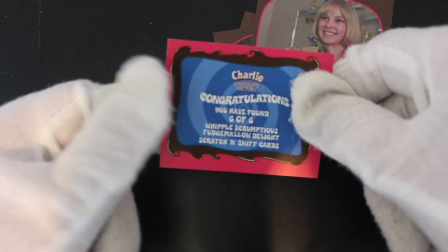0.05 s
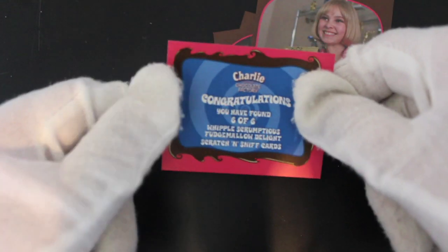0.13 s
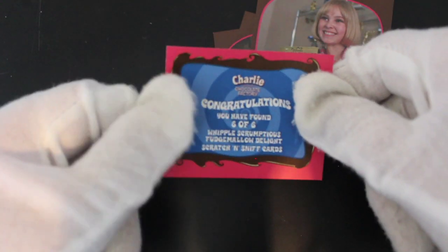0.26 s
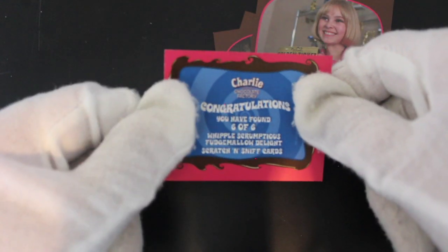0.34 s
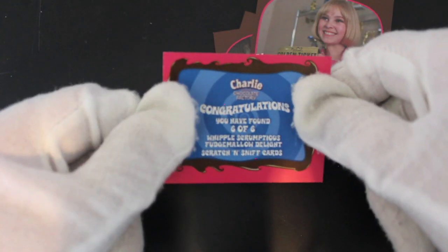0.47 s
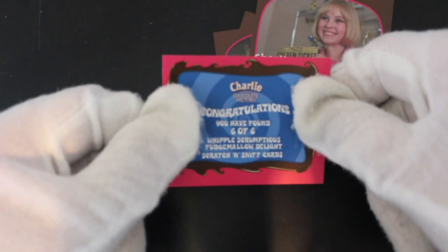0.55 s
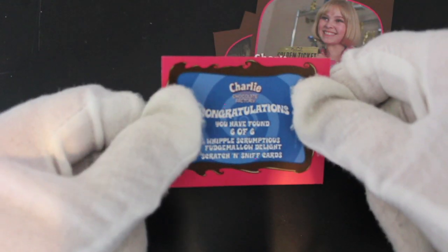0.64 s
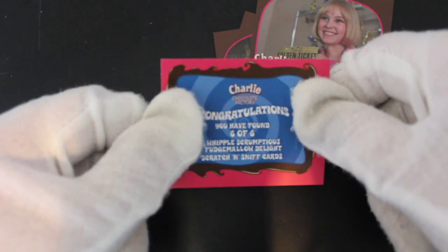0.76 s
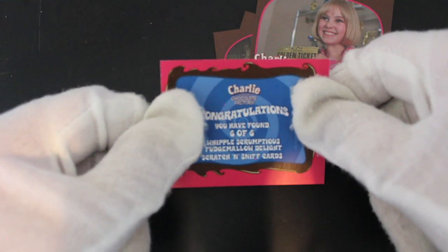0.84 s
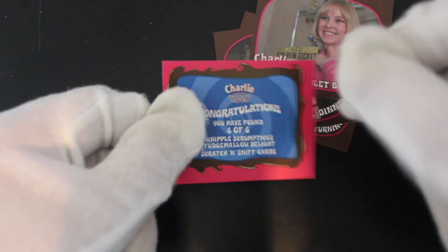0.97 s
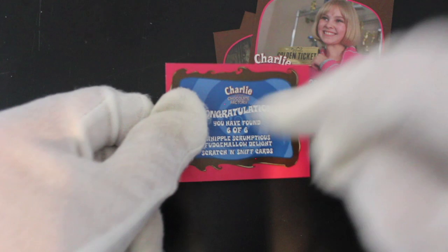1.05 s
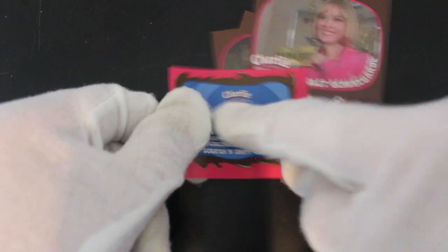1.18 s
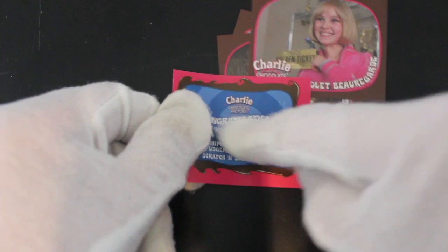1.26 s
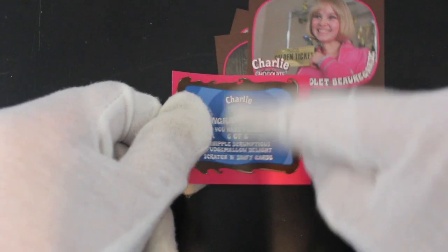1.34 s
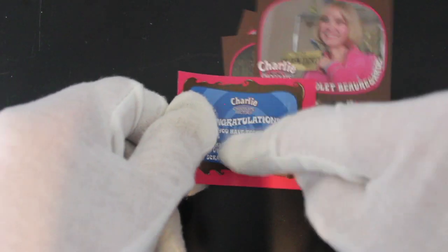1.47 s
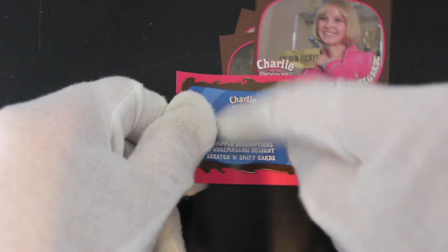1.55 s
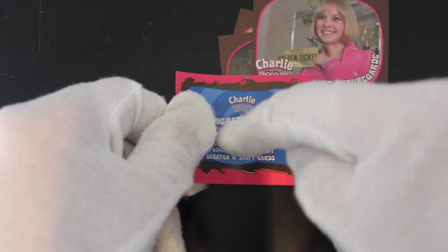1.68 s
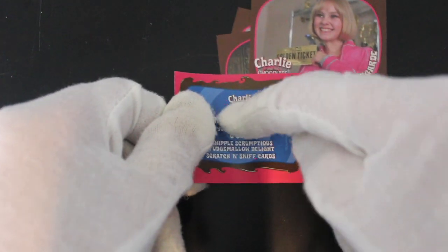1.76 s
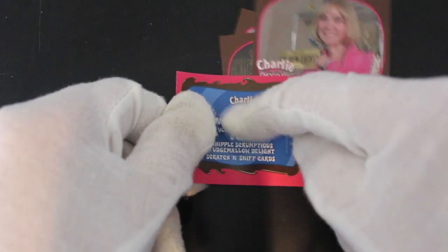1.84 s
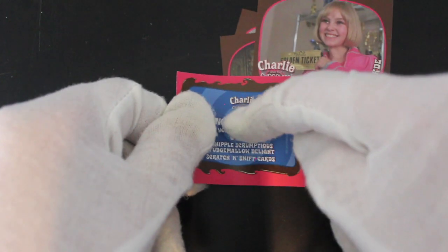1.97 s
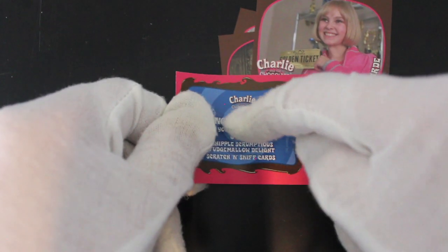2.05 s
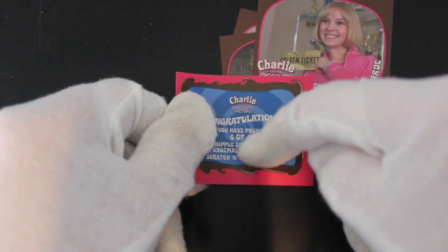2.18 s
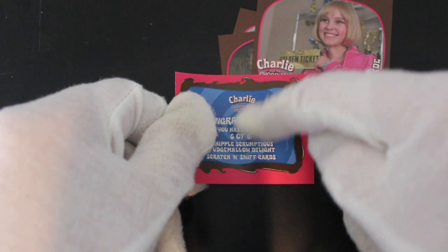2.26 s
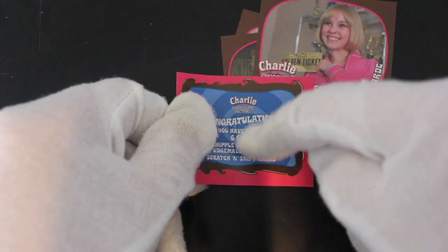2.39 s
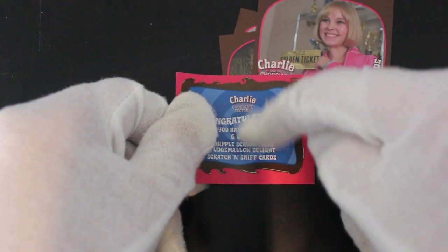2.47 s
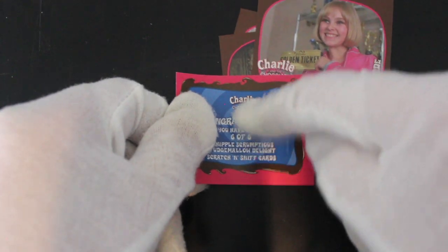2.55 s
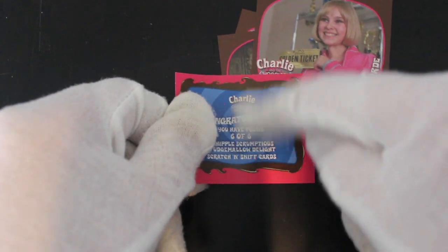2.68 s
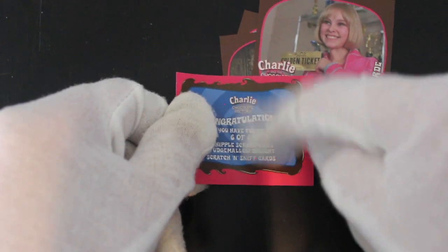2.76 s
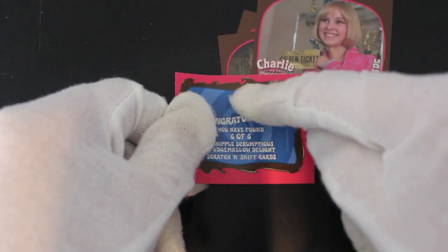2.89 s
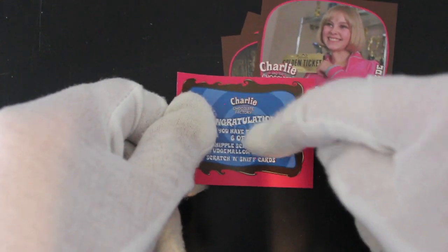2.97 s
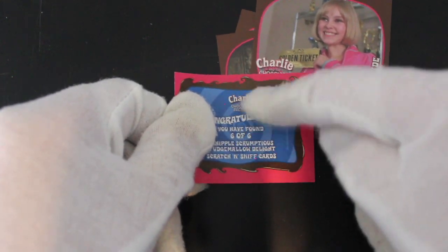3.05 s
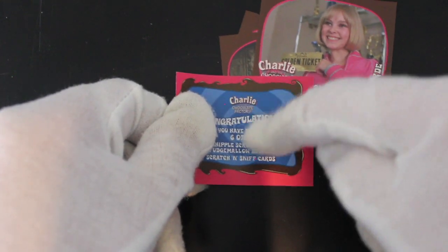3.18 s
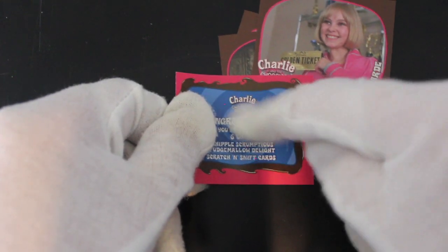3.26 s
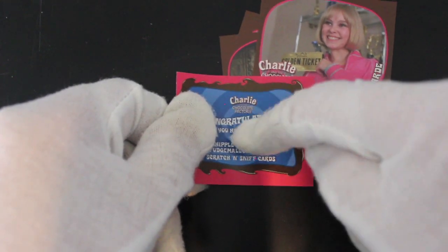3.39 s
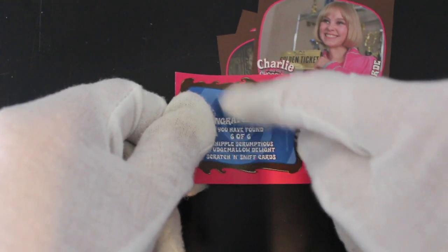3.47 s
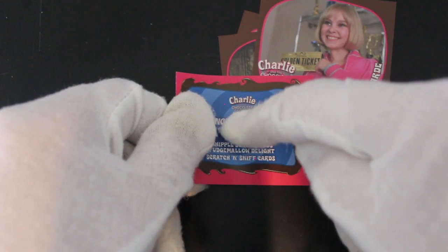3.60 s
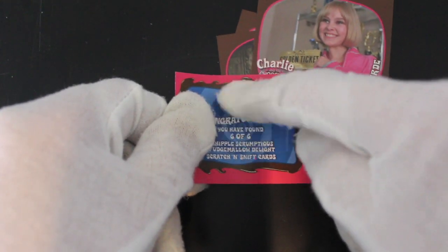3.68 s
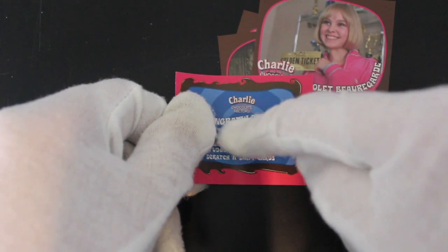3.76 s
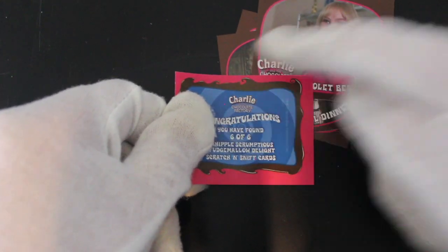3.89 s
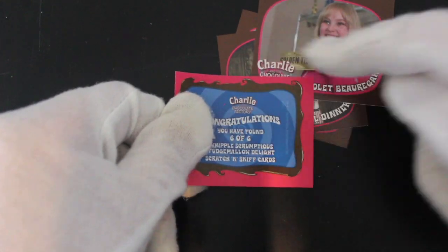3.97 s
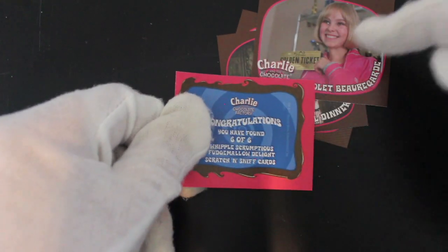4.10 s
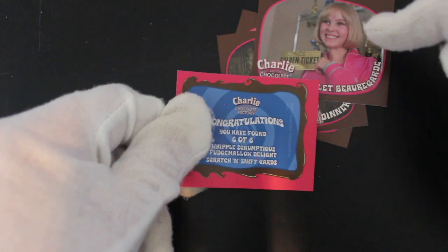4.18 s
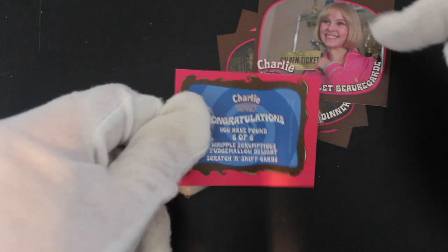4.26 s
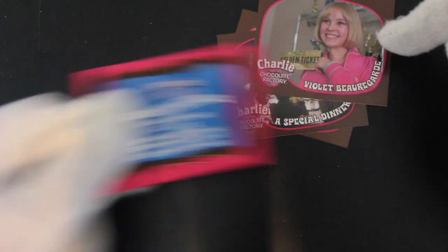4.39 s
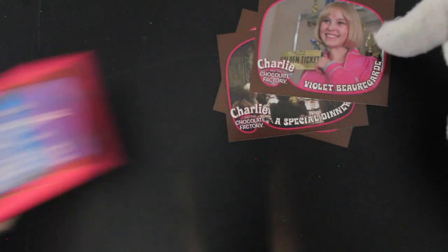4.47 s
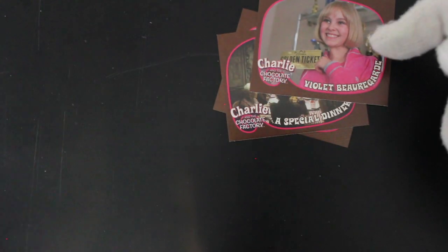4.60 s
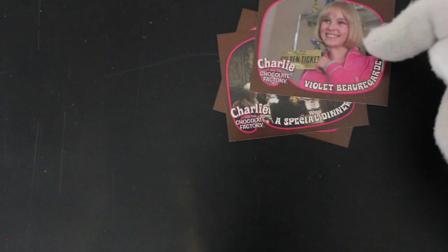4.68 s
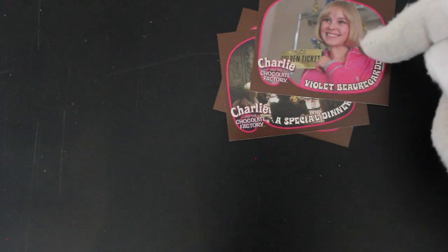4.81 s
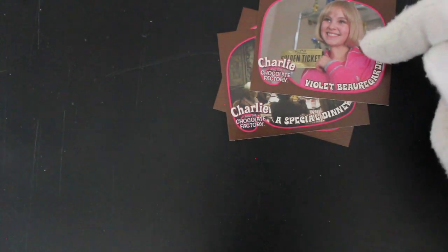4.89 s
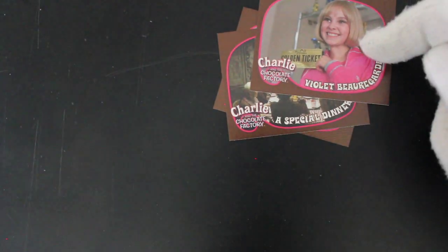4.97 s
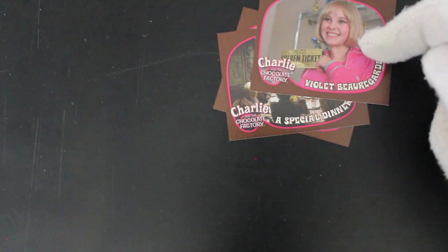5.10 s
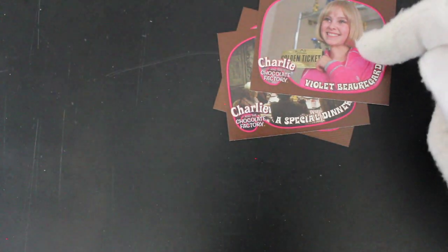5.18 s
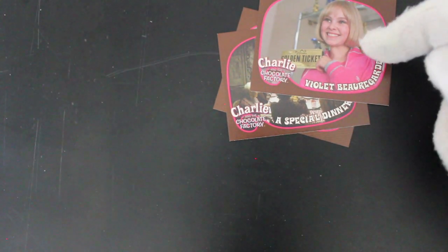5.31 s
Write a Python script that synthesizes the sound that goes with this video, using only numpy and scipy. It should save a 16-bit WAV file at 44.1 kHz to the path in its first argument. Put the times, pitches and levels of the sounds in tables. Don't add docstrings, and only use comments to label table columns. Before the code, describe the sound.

After about a second of near quiet, with faint cloth rustle and microphone hiss, a few snaps lead into rapid, airy scratch strokes of a gloved finger on stiff card. The strokes grow harder and more hollow, with tiny squeaks and low bumps through the table, then stop. A little handling and rustle follow. Close stereo microphone, small quiet room.

```python
import sys
import numpy as np
from scipy import signal
from scipy.fft import rfft, irfft, next_fast_len
from scipy.io import wavfile

SR = 44100
rng = np.random.default_rng(int(sys.argv[2]) if len(sys.argv) > 2 else 0)


def wrap_up_sound(samples):
    columns = np.atleast_2d(samples).T
    tamed = np.clip(columns, -1, 1)
    steps = np.round(tamed * 32767).astype(np.int16)
    wavfile.write(sys.argv[1], SR, steps)


def voltage_ratio(decibels):
    exponent = np.asarray(decibels, float) / 20
    return 10 ** exponent


N = 235494


def rms_one(x):
    return x / np.sqrt(np.mean(x ** 2) + 1e-20)


def in_time(rows):
    s, *columns = np.transpose(rows)
    return [np.interp(np.arange(N) / SR, s, column) for column in columns]


def at_hz(points, hz):
    point_hz, values = np.transpose(points)
    return np.interp(np.log(hz + 1), np.log(point_hz), values)


def bins(samples):
    size = next_fast_len(samples)
    return size, np.arange(size // 2 + 1) * SR / size


def coloured(x, spectrum):
    size, hz = bins(N)
    shaped = rfft(x, size) * voltage_ratio(at_hz(spectrum, hz))
    return rms_one(irfft(shaped, size)[..., :N])


def drift(rate):
    knots = rng.standard_normal(int(N / SR * 400))
    return np.interp(np.arange(N) / SR * rate, np.arange(len(knots)), knots)


def grains(per_s, spread_db):
    sizes = voltage_ratio(spread_db * np.minimum(rng.exponential(1, N), 5))
    signs = rng.choice([-1, 1], N)
    return rms_one(sizes * signs * (rng.random(N) < per_s / SR))


def resonance(x, hz, width):
    r = np.exp(-np.pi * max(width, 5) / SR)
    zeros = np.array([1, 0, -1]) * (1 - r * r) / 2
    poles = [1, -2 * r * np.cos(2 * np.pi * hz / SR), r * r]
    return signal.lfilter(zeros, poles, x + 1e-18)


# (frequency [Hz], density [dB per Hz])
FLOOR_COLOUR = [(60, -18.5), (155, 6.5), (200, -2), (300, -5.5), (430, -7.5), (700, -11.5), (2900, -21.5),
                (15600, -22)]


def background_noise():
    return voltage_ratio(-72.5 + 3.5) * coloured(rng.standard_normal((2, N)), FLOOR_COLOUR)


# (time [s], level [dB])
RUSTLE_LEVEL = [(0.0, -65.5), (.06, -81), (0.77, -83.5), (1.1, -80.5), (1.33, -79), (1.4, -71.5),
                (1.7, -79), (2.1, -83), (2.29, -80), (2.77, -86), (3.58, -75.5), (3.87, -87), (4.12, -79),
                (4.49, -79.5), (4.9, -72), (5.34, -76.5)]


def rustle():
    level_db, = in_time(RUSTLE_LEVEL)
    cloth_colour = [(500, 2.5), (1800, -2.5), (2600, -1.5), (3800, -4.5), (5000, -7.5), (8000, -9.0)]
    cloth = coloured(grains(4000, 2.1), cloth_colour)
    fuzz = coloured(grains(6900, 3.3), FIBRE_HISS)
    return voltage_ratio(level_db + 2.0 * drift(30)) * (cloth + voltage_ratio(-8) * fuzz)


# (time [s], level [dB])
ARM_TENSION = [(0, -55.5), (.22, -50), (.4, -57), (1.12, -57.5), (1.35, -43.5), (1.75, -39.5), (2.15, -51),
               (2.5, -45), (2.7, -49.5), (2.95, -39.5), (3.3, -42), (4.0, -46), (4.13, -50), (4.4, -57),
               (4.65, -53), (4.9, -51.5), (5.34, -58)]
# (time [s], thrust [dB], sharp part [dB])
HAND_JOLTS = [(1.289, -42, -86), (1.415, -31, -62), (1.62, -37, -76), (1.86, -46, -64.5),
              (2.074, -50.5, -62.5), (2.222, -52.5, -68.5), (2.347, -42.5, -57.5), (2.439, -36, -77),
              (2.56, -36.5, -59.5), (2.798, -30, -50.5), (2.927, -34, -68), (2.978, -34.5, -53),
              (3.06, -38, -79), (3.106, -36, -74), (3.168, -62, -58), (3.37, -39.5, -53.5),
              (3.57, -52, -58), (3.721, -51, -59.5), (3.812, -39.5, -62), (3.92, -56, -67),
              (4.019, -43, -65), (4.52, -51, -58.5), (4.948, -65, -66.5), (5.21, -71, -62.5)]


def tremor():
    arm_db, = in_time(ARM_TENSION)
    upper_db = -76 + 0.66 * (arm_db + 53.5)
    deep, upper = voltage_ratio(2 * arm_db), voltage_ratio(2 * upper_db)
    rise_db_per_s, fall_db_per_s, sharp_faster = 314, 185, 1.6
    t = np.arange(N) / SR
    for s, thrust_db, sharp_db in HAND_JOLTS:
        near = slice(int((s - .15) * SR), int((s + .25) * SR))
        u = t[near] - s
        away_db = np.where(u < 0, rise_db_per_s * u, -fall_db_per_s * u)
        deep[near] += voltage_ratio(2 * (thrust_db + away_db))
        upper[near] += voltage_ratio(2 * (sharp_db + sharp_faster * away_db))
    return np.sqrt(deep), np.sqrt(upper)


# (centre [s], half length [s], pitch [Hz], level [dB])
STAND_SWAYS = [(1.322, 0.019, 112, -64), (1.409, 0.026, 38, -32), (1.62, 0.011, 45, -36),
               (1.88, 0.041, 49.96, -41), (2.096, 0.024, 57.1, -33.5), (2.24, 0.046, 55.1, -43),
               (2.2, 0.034, 106.8, -63), (2.326, .03, 115.4, -52), (2.439, 0.036, 59.9, -36.5),
               (2.572, 0.033, 55.1, -37.5), (2.628, 0.015, 51.1, -33), (2.815, 0.039, 44.2, -29),
               (2.79, 0.037, 94.5, -42.5), (2.887, .02, 90.3, -48), (2.983, 0.016, 94.8, -35.5),
               (3.078, 0.022, 103, -45), (3.164, 0.021, 95, -63), (3.379, 0.023, 50.14, -31.5),
               (3.365, .025, 95, -45), (3.714, 0.036, 45, -36), (4.416, 0.092, 56, -46.5),
               (4.524, .03, 133, -71), (4.585, 0.032, 129.3, -63), (4.995, 0.033, 120.9, -54),
               (5.077, 0.024, 104.5, -46), (5.2, 0.099, 101.3, -58), (2.07, 0.015, 233.6, -59.5),
               (2.359, 0.042, 224.3, -62.5), (2.552, 0.022, 231, -62), (2.786, 0.035, 246, -62),
               (2.866, 0.018, 223.4, -61), (3.596, 0.05, 65.1, -37), (2.975, 0.013, 231, -49.5),
               (2.965, 0.013, 365, -56), (3.171, 0.021, 228.4, -52.5), (3.355, .04, 231.7, -55),
               (3.422, 0.018, 211, -62.5), (3.586, 0.039, 240.4, -63.5), (3.505, 0.023, 300, -70),
               (3.99, 0.022, 246.5, -61.5)]


def sways():
    t, waver = np.arange(N) / SR, np.cumsum(drift(18)) / SR
    out = np.zeros(N)
    for s, half, hz, level_db in STAND_SWAYS:
        swell = voltage_ratio(level_db - 10.0 * ((t - s) / half) ** 2)
        out += swell * np.sin(2 * np.pi * hz * (t + 0.0156 * waver))
    return out


# (frequency [Hz], density [dB per Hz])
DEEP_RUMBLE = [(8, -5), (14, 12), (30, 3.5), (45, -0.5), (66, -2), (88, -18), (140, -70)]
UPPER_RUMBLE = [(50, -44), (80, 3), (117, 1), (200, -17.5), (230, -10), (262, -14.5), (320, -17.5),
                (900, -47.5)]
# (frequency [Hz], left over right [dB])
STAND_BALANCE = [(20, -9), (54, -5), (80, -1.5), (135, -11), (172, -9.5), (205, -11), (300, -8), (400, 2.5)]
# (frequency [Hz], right leads by [rad])
STAND_LEAD = [(20, 1.1), (32, .3), (54, 1.2), (86, 4.1), (108, 4.4), (160, 2.0), (230, 5.0), (400, 6.2)]


def shaking():
    deep, upper = tremor()
    white = rng.standard_normal((2, 3, N))
    rumble = deep * coloured(white[0], DEEP_RUMBLE)
    rumble += upper * voltage_ratio(6.0 + 1.08 * drift(29)) * coloured(white[1], UPPER_RUMBLE)
    rumble[0] += sways()
    size, hz = bins(N)
    shared, left, right = rfft(rumble, size)
    shade, own = voltage_ratio(at_hz(STAND_BALANCE, hz) / 2), .8
    turned = shared * np.exp(1j * at_hz(STAND_LEAD, hz))
    return irfft([shade * shared + own * left, turned / shade + own * right], size)[:, :N]


# (centre [s], half length [s], pitch [Hz], level [dB])
GLOVE_SQUEAKS = [(0.008, 0.014, 1570, -69), (0.008, 0.01, 2670, -75), (1.098, 0.018, 2750, -77.5),
                 (1.133, 0.016, 2480, -70), (1.139, .008, 2370, -76), (1.151, 0.012, 2530, -73.5),
                 (1.382, 0.014, 3000, -69), (1.434, 0.02, 3200, -65.5), (1.545, 0.085, 3000, -72.5),
                 (1.653, 0.061, 3340, -74), (2.199, 0.0072, 3500, -67), (2.026, .008, 2900, -69),
                 (2.382, 0.011, 3600, -68.5), (3.657, 0.026, 3700, -73), (4.024, 0.027, 4020, -70.5),
                 (3.213, 0.033, 3570, -66), (3.944, 0.012, 1078, -58), (4.497, 0.0077, 1500, -67),
                 (5.204, 0.022, 2430, -74.5), (5.247, 0.036, 2780, -80), (5.249, 0.022, 3700, -78)]


def squeaks():
    out, t, slips = np.zeros(N), np.arange(N) / SR, grains(3110, 0.79)
    for s, half, hz, level_db in GLOVE_SQUEAKS:
        near = slice(max(int((s - .06) * SR), 0), int((s + 0.061) * SR))
        width = .11 * hz * (hz / 2000) ** 2
        narrow = rms_one(resonance(resonance(slips[near], hz, width), hz, width))
        out[near] += narrow * voltage_ratio(level_db - 23.0 * ((t[near] - s) / half) ** 2)
    return out


# (centre [s], half length [s], pitch [Hz], level [dB])
MODE_LOCKS = [(0.01, .012, 1570, -72), (1.133, .012, 2560, -64), (1.369, 0.011, 430, -59.5),
              (1.369, 0.0073, 761, -61), (2.786, 0.02, 1030, -65), (2.804, 0.0074, 1030, -62),
              (2.964, .012, 580, -56), (3.152, .012, 545.5, -55), (2.952, .003, 3106, -51),
              (3.336, .008, 560, -62), (3.363, .008, 1570, -56), (4.499, .005, 1570, -65),
              (2.957, 0.0061, 3047, -57), (2.96, 0.0076, 1647, -55), (2.964, 0.0072, 1030, -61),
              (2.974, .005, 3360, -55), (2.983, 0.006, 1660, -54), (3.14, 0.0094, 3000, -57),
              (3.141, 0.0059, 1030, -58), (3.147, 0.0056, 2144, -53), (3.154, 0.0073, 1810, -51),
              (3.155, 0.013, 1030, -50), (3.323, 0.0046, 1036, -49), (3.329, .01, 2140, -67),
              (3.338, 0.0079, 810, -57), (3.367, 0.01, 2206, -51), (3.369, 0.0046, 1760, -43.5),
              (3.374, 0.0049, 1870, -40), (3.371, 0.0094, 1030, -50), (3.378, .005, 3070, -54),
              (3.4, 0.0089, 1885, -57), (3.572, 0.0062, 2140, -50.5), (3.728, .005, 2750, -59),
              (3.744, 0.0074, 1042, -45), (3.745, 0.0049, 2200, -58), (3.745, 0.012, 1734, -58),
              (3.747, 0.0086, 3060, -60), (3.761, 0.008, 1041, -47.5), (3.774, 0.0068, 1045, -52.5),
              (3.549, 0.0062, 1030, -61), (3.864, 0.0055, 2940, -66), (3.938, 0.012, 2140, -57)]


def locks():
    out, t = np.zeros(N), np.arange(N) / SR
    clock = t + .014 * np.cumsum(drift(350)) / SR
    flicker = voltage_ratio(1.5 * drift(300))
    for s, half, hz, level_db in MODE_LOCKS:
        near = slice(int((s - .05) * SR), int((s + .05) * SR))
        swell = voltage_ratio(level_db - 20.0 * ((t[near] - s) / max(half, .002)) ** 2)
        out[near] += swell * np.sin(2 * np.pi * hz * clock[near])
    return out * flicker


# (start [s], length [s], fibre hiss [dB], pressure on the card [dB])
FINGER_STROKES = [(1.364, 0.045, -55, -69), (1.408, 0.094, -59, -97), (1.517, 0.07, -55.5, -73.5),
                  (1.595, 0.09, -52.5, -84), (1.72, 0.06, -56, -70.5), (1.838, 0.046, -53, -101),
                  (1.911, 0.056, -51.5, -110), (1.967, 0.042, -61, -90), (2.039, 0.037, -54, -81),
                  (2.261, 0.091, -58, -73), (2.385, 0.11, -56, -94), (2.525, 0.091, -56, -68),
                  (2.634, 0.085, -58.5, -78.5), (2.761, 0.045, -54.5, -65), (2.839, 0.074, -58, -71),
                  (2.943, 0.068, -61, -58), (3.022, 0.074, -60, -71.5), (3.123, 0.069, -60, -56),
                  (3.197, 0.077, -58, -73), (3.311, 0.11, -77, -59), (3.357, 0.025, -62, -57),
                  (3.423, 0.084, -59, -74), (3.542, 0.055, -58, -58.5), (3.617, 0.074, -55.5, -70),
                  (3.718, 0.071, -54, -56.5), (3.831, 0.055, -56.5, -73), (3.902, 0.059, -51, -83),
                  (3.987, 0.06, -55.5, -70.5), (4.516, 0.068, -62.5, -107)]
# (time [s], overshoot [dB])
FIBRE_CATCHES = [(1.374, 1), (1.4233, 6), (1.5281, 2), (1.6114, -2), (1.736, 5.5), (1.8474, 6.5),
                 (1.92, -0.5), (1.975, 3), (2.0479, 2), (2.298, 2), (2.397, -3), (2.5418, 2), (2.654, 7),
                 (2.7723, 3), (2.8566, 5), (2.9504, 3), (3.0312, -1), (3.1299, 8), (3.2247, 5), (3.3175, 2),
                 (3.3774, 2), (3.435, 1), (3.5415, 9), (3.6338, 2), (3.7401, 5), (3.8373, 3), (3.9162, -2),
                 (3.995, 3), (4.53, -2)]
# (time [s], half width [s], card [dB], favoured mode [Hz], hiss [dB])
NAIL_DIGS = [(1.124, 0.007, -63, 2520, -66), (1.436, 0.0093, -71, 3000, -56),
             (1.855, 0.016, -67, 1030, -74), (2.045, 0.01, -64, 930, -65.5),
             (2.315, 0.015, -66.5, 2120, -66), (2.349, 0.023, -66.5, 1100, -73),
             (2.545, 0.0029, -68.5, 1530, -49.5), (2.78, 0.0087, -60, 1000, -62),
             (2.951, 0.0022, -46, 3000, -70), (2.962, 0.0023, -47, 930, -50),
             (3.143, 0.0049, -51, 2140, -70), (3.16, 0.0038, -51.5, 1030, -56),
             (3.242, 0.0064, -62, 1810, -69), (3.321, 0.0079, -74, 1080, -62),
             (3.354, 0.0032, -53, 2140, -80), (3.377, 0.0067, -53.5, 2750, -55.5),
             (3.396, 0.008, -66, 1860, -74), (3.565, 0.0041, -50, 2140, -63),
             (3.744, 0.0068, -49.5, 2140, -81), (3.759, 0.0044, -60, 1030, -79),
             (3.936, 0.0083, -56, 2140, -61.5), (4.016, 0.0071, -68, 1810, -59)]
# (frequency [Hz], width [Hz], level [dB])
CARD_MODES = [(234, 22, 2), (345, 44, -2.5), (460, 40, -2), (560, 50, 1), (630, 45, -0.5), (810, 27, 1),
              (1030, 33, 2.5), (1300, 37, -1.5), (1570, 120, -2), (1810, 40, 1), (2140, 66, -3.5),
              (2750, 170, -8.5), (3000, 39, -6.5), (3280, 410, -11)]


def contact():
    t = np.arange(N) / SR
    power = np.zeros((2 + len(CARD_MODES), N))
    octaves = np.log2(np.array(CARD_MODES)[:, 0])
    first_start = FINGER_STROKES[0][0]
    for (start, length, late_db, card_db), (catch, overshoot_db) in zip(FINGER_STROKES, FIBRE_CATCHES):
        early_db = late_db - 4.5
        rasp_db = -57.5 - 10 + 0.2 * (late_db + 58.5) + 0.15 * (card_db + 61.0)
        rasp_db += 6.5 * np.exp(-(start - first_start) / 0.13)
        near = slice(int((start - .04) * SR), int((start + length + 0.055) * SR))
        u = t[near] - start
        speed_s = [-.03, 0, .014, length - .011, length, length + 0.01]
        speed_db = np.interp(u, speed_s, [-76, -13.5, -2.0, -8.0, -17.0, -44])
        since = t[near] - catch
        catch_db = np.interp(since, [-0.0027, 0], [-2.5, overshoot_db])
        catch_db *= np.exp(-np.maximum(since, 0) / 0.0077)
        swell_db = np.interp(u, [0.39 * length, 0.55 * length], [early_db, late_db])
        power[0, near] += voltage_ratio(2 * (speed_db + catch_db + swell_db))
        power[1, near] += voltage_ratio(2 * (0.61 * speed_db + rasp_db))
        power[2:, near] += voltage_ratio(2 * (1.4 * speed_db + card_db))
    for s, width, card_db, favoured_hz, hiss_db in NAIL_DIGS:
        rasp_db = -2.5 + hiss_db + 0.46 * (card_db - hiss_db)
        near = slice(int((s - .08) * SR), int((s + 0.049) * SR))
        u = (t[near] - s) / max(width, .002)
        bump_db = -8.0 * np.where(u < 0, -u / 0.66, u / 1.2) ** 0.75
        favour_db = 10.0 * np.exp(-((octaves - np.log2(favoured_hz)) / 0.19) ** 2) - 6.0
        power[0, near] += voltage_ratio(2 * (hiss_db + 0.74 * np.interp(u - .4, u, bump_db)))
        power[1, near] += voltage_ratio(2 * (rasp_db + np.interp(u + 0.36, u, bump_db)))
        power[2:, near] += voltage_ratio(2 * (card_db + bump_db + favour_db[:, None]))
    return np.sqrt(power)


# (frequency [Hz], density [dB per Hz])
FIBRE_HISS = [(2500, -34), (4500, -14), (6200, -18), (7200, -7.5), (10500, -3.5), (12500, -5.5),
              (13500, -17.5), (15500, -13.5)]
DULL_FIBRE_HISS = [(3500, -42), (4700, -10.5), (5600, -0.5), (6800, 3), (8000, -22), (13000, -21),
                   (14300, -8), (15500, -9)]
NAIL_RASP = [(600, -8), (1500, -6.5), (2300, -2), (3000, -1), (3900, -1), (5000, -8), (7000, -44)]
# (time [s], level [dB])
FINGER_FLATNESS = [(1.3, -10), (1.6, -12), (1.95, -11), (2.2, -9), (2.7, -20), (2.93, -12), (2.97, -4),
                   (3.05, -19), (3.4, -12), (3.7, -10.5), (4.1, -8.5), (4.6, -13)]


def scratching():
    hiss, rasp, *modes = contact()
    hiss = hiss * voltage_ratio(1.54 * drift(120) + 1.55 * drift(39.94)[::-1])
    fibres = grains(14000, 3.9)
    flat_db, = in_time(FINGER_FLATNESS)
    dull = voltage_ratio(flat_db) * coloured(fibres[::-1], DULL_FIBRE_HISS)
    point = hiss * (coloured(fibres, FIBRE_HISS) + dull)
    point += rasp * voltage_ratio(2.0 * drift(90)) * coloured(grains(5000, 2.6), NAIL_RASP)
    slips = grains(3500, 3.4)
    for k, ((hz, width, level_db), drive) in enumerate(zip(CARD_MODES, modes)):
        sign = (-1) ** k
        point += sign * voltage_ratio(level_db + 17.0) * resonance(drive * slips, hz, 1.94 * width)
    scattered = voltage_ratio(-6) * hiss * coloured(rng.standard_normal((2, N)), FIBRE_HISS)
    return point, scattered


# (time [s], ring [dB], ring [Hz], knock [dB], knock [Hz])
CARD_SNAPS = [(1.2508, -51.5, 2960, -55.5, 770), (1.2595, -55, 2240, -81, 700),
              (1.3026, -52, 2800, -51.5, 690), (1.312, -60, 3080, -72, 660),
              (1.365, -43.5, 2750, -50.5, 686), (1.374, -45, 3340, -56, 596), (1.3797, -53, 3030, -65, 595),
              (1.712, -79, 1700, -68, 495), (1.730, -54, 2610, -54, 890), (1.8477, -59, 7260, -63, 1030),
              (2.0325, -50, 3000, -72, 600), (2.194, -63, 3520, -56.5, 636), (2.3797, -60, 1110, -49, 604),
              (2.3955, -58, 3760, -48, 398), (2.625, -76, 810, -50, 523), (2.773, -52.5, 3960, -49, 795),
              (2.832, -60, 1300, -47.5, 583), (3.139, -61, 2920, -61, 1030), (3.318, -62, 2900, -49, 1030),
              (3.549, -74, 2140, -53, 1030), (3.725, -58, 2200, -58, 910), (4.4945, -59, 1570, -57, 514),
              (4.574, -65, 1000, -60, 554)]


def ticks():
    length = 1300
    out, t = np.zeros(N), np.arange(length) / SR
    white = rng.standard_normal((len(CARD_SNAPS), length))
    cracks = signal.lfilter(*signal.butter(1, 6200, fs=SR), white)
    for (s, ring_db, ring_hz, knock_db, knock_hz), crack in zip(CARD_SNAPS, cracks):
        snap = np.sin(2 * np.pi * ring_hz * t) * voltage_ratio(ring_db - 60 * t / 0.0081)
        snap -= np.sin(2 * np.pi * knock_hz * t) * voltage_ratio(knock_db - 60 * t / 0.012)
        snap += crack * voltage_ratio(ring_db - 1.5 - 60 * t / 0.0084)
        first = round(s * SR)
        out[first:first + length] += snap
    return out


# (time [s], peak level [dB])
NAIL_CLICKS = [(1.2509, -57), (1.3027, -58), (1.3652, -47), (1.3742, -52), (1.3772, -54), (1.3798, -45),
               (1.3825, -54), (1.7313, -53), (2.0328, -57), (2.5445, -56), (2.775, -54), (2.9627, -55),
               (2.965, -48), (3.1555, -48), (3.1605, -43), (3.3775, -43), (3.551, -56), (3.9395, -54)]


def clicks():
    out = np.zeros(N)
    for s, level_db in NAIL_CLICKS:
        out[round(s * SR)] = voltage_ratio(level_db + 10.0)
    return signal.lfilter(*signal.butter(1, [1500, 9000], "band", fs=SR), out + 1e-18)


# (frequency [Hz], left over right [dB])
CARD_BALANCE = [(200, -9), (420, -4.5), (700, 0.5), (2400, 1), (4400, -1.5), (8000, 0), (15000, 9.5)]
# (frequency [Hz], level [dB])
ROOM_COLOUR = [(400, -4), (800, -9), (1400, -9), (2600, -3), (4000, 0), (6000, -2), (12000, -2)]


def at_capsules(x):
    t60_s, near_t60_s, room_db, left_lead = 0.12, 0.0079, -3.5, 1.69
    size, hz = bins(N + SR // 2)
    t = np.arange(SR // 3) / SR
    decay = voltage_ratio(-60 * t / t60_s) + 3.5 * voltage_ratio(-60 * t / near_t60_s)
    tail = rng.standard_normal((2, len(t))) * decay * (t > .0008)
    tail = voltage_ratio(room_db) * tail / np.sqrt(np.sum(tail ** 2, axis=1, keepdims=True))
    shade = voltage_ratio(at_hz(CARD_BALANCE, hz) / 2)
    direct = np.array([shade * np.exp(2j * np.pi * hz * left_lead / SR), 1 / shade])
    reflected = voltage_ratio(at_hz(ROOM_COLOUR, hz)) * rfft(tail, size)
    return irfft(rfft(x, size) * (direct + reflected), size)[:, :N]


def scene():
    hiss = background_noise()
    point, scattered = scratching()
    at_card = rustle() + squeaks() + locks() + point + ticks() + clicks()
    return at_capsules(at_card) + scattered + shaking() + hiss


def top_cut(x):
    return signal.sosfilt(signal.butter(12, 15827, fs=SR, output="sos"), x)


def record(dry):
    low_pass = signal.ellip(12, .3, 60, 15700, fs=SR, output="sos")
    cut = signal.sosfilt(low_pass, dry)
    return top_cut(cut)


dry = scene()
out = record(dry)
wrap_up_sound(out)
```